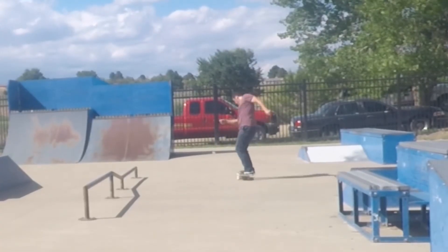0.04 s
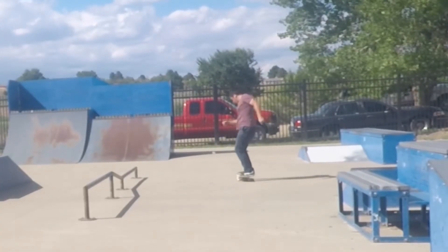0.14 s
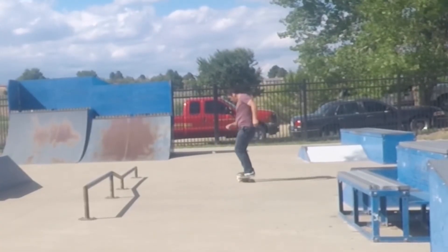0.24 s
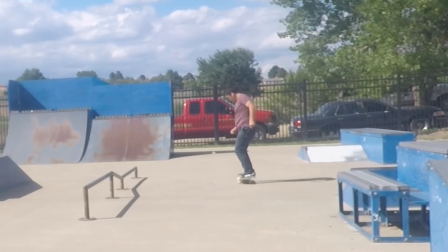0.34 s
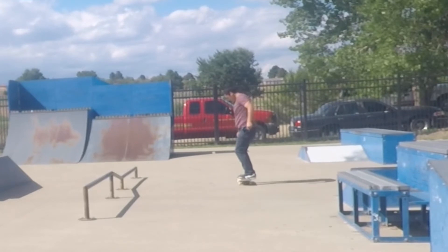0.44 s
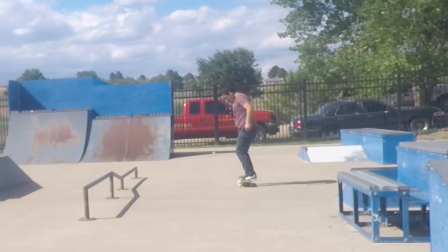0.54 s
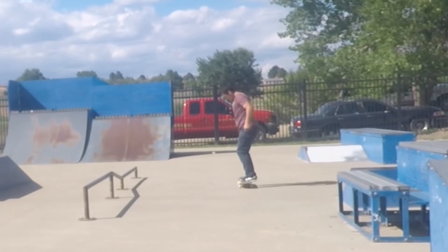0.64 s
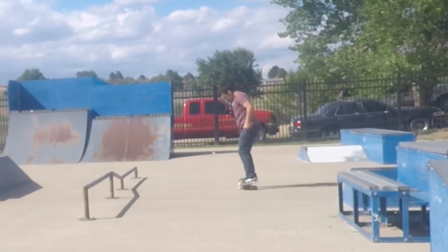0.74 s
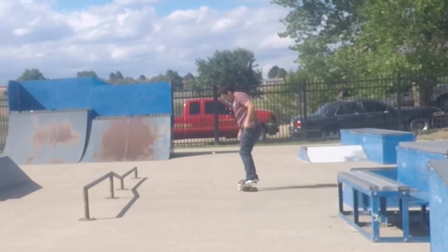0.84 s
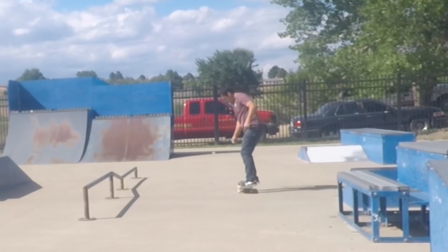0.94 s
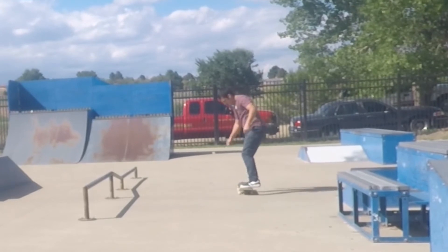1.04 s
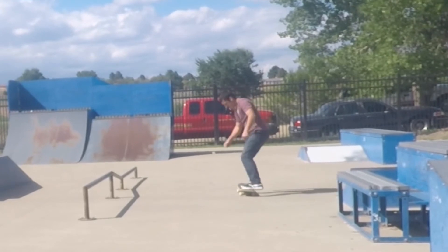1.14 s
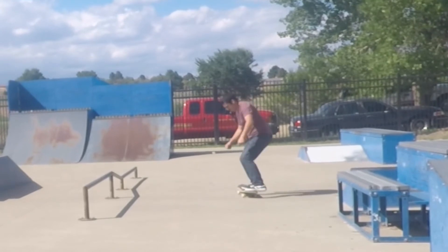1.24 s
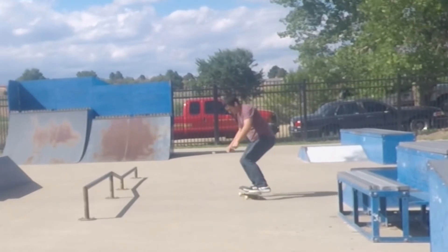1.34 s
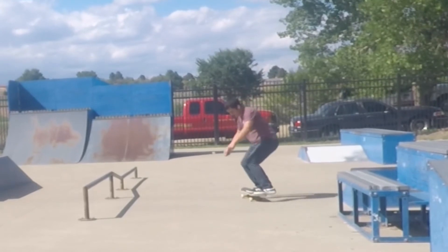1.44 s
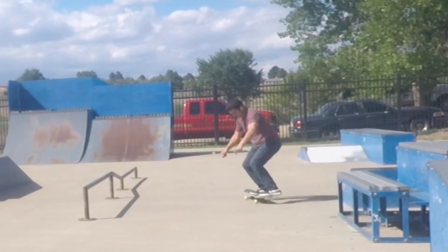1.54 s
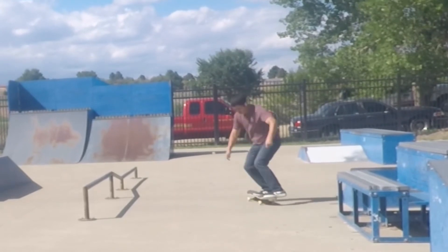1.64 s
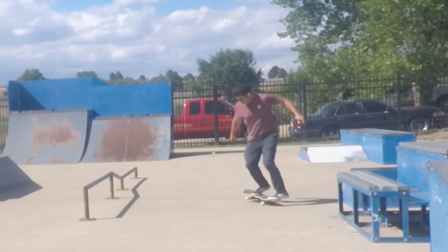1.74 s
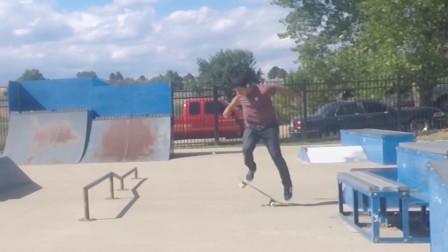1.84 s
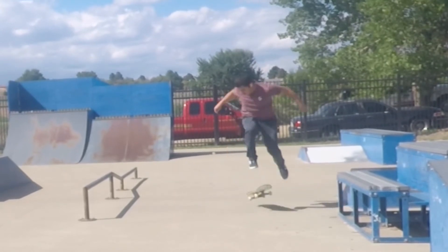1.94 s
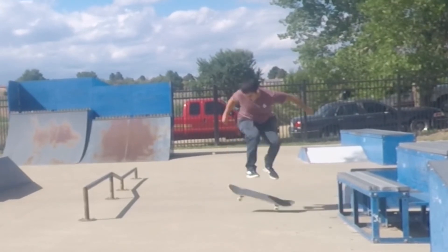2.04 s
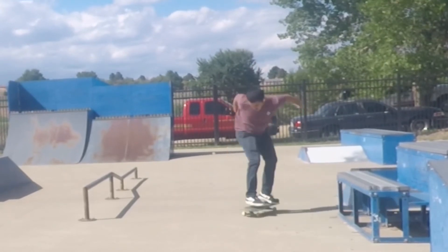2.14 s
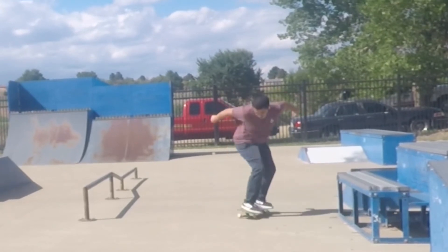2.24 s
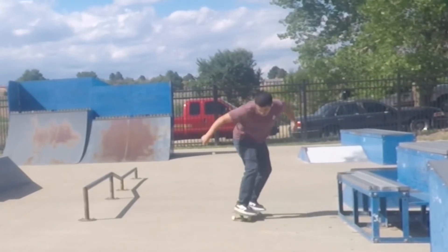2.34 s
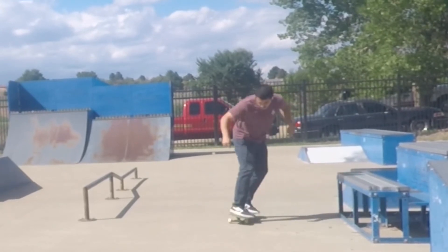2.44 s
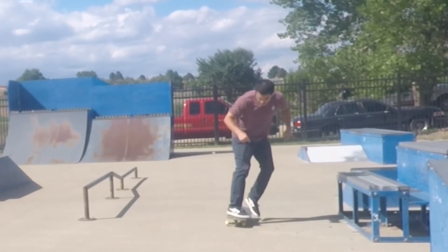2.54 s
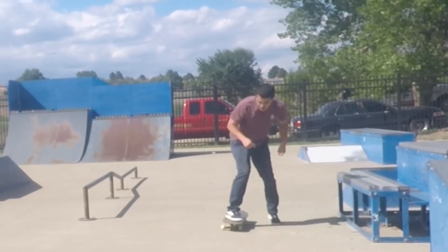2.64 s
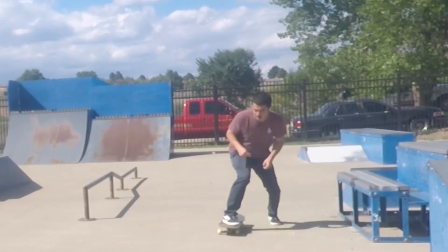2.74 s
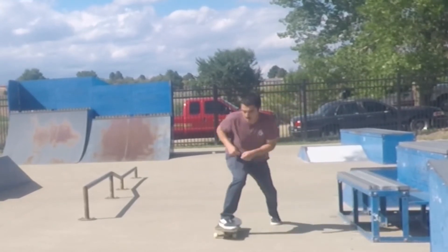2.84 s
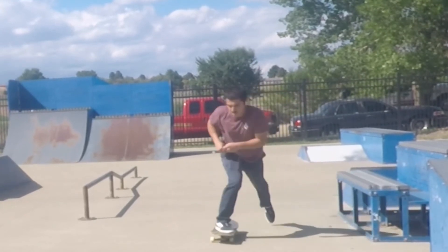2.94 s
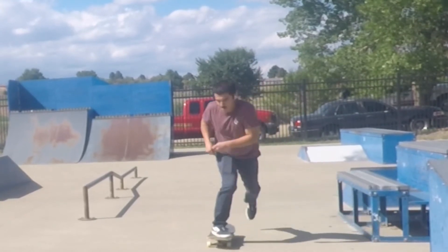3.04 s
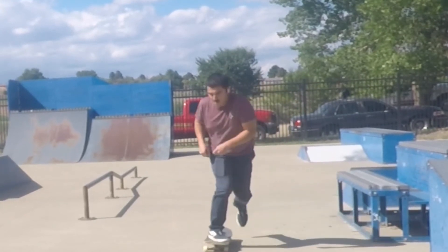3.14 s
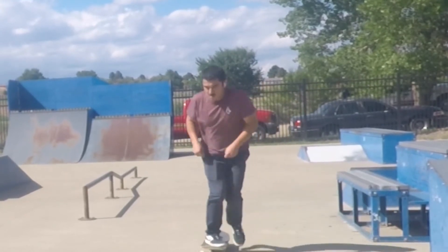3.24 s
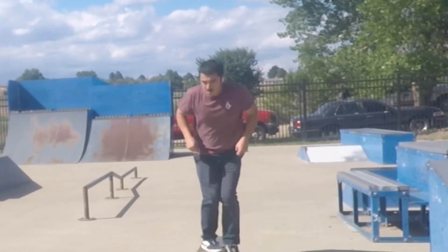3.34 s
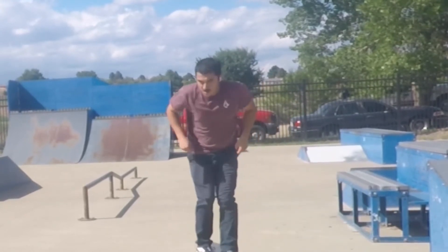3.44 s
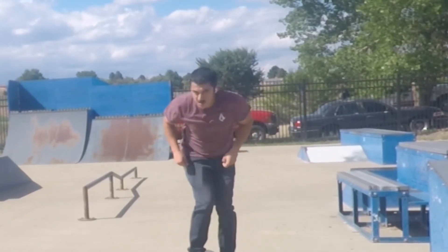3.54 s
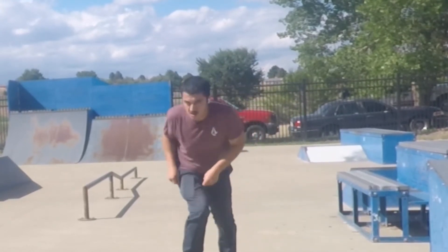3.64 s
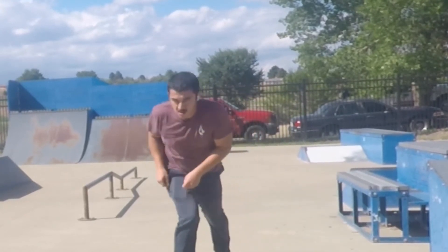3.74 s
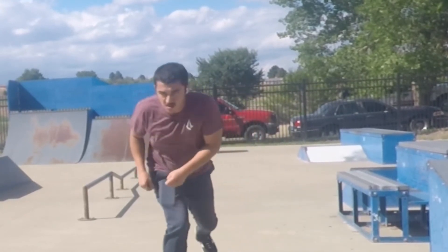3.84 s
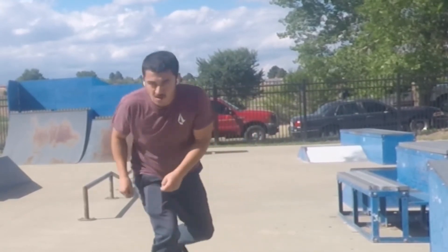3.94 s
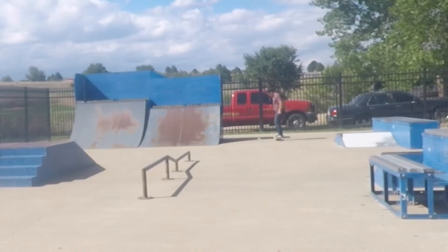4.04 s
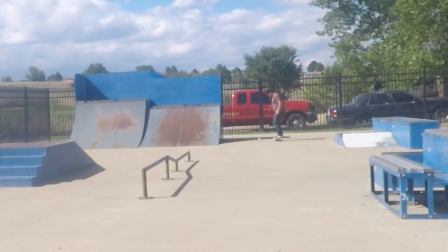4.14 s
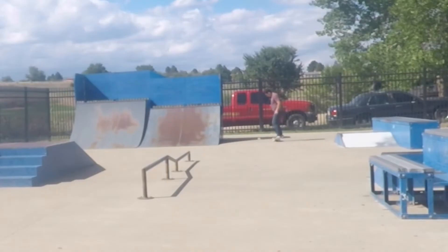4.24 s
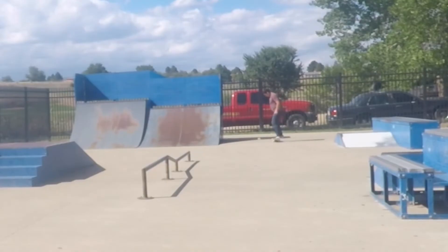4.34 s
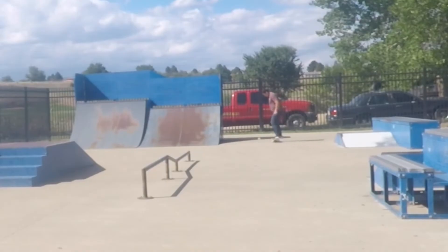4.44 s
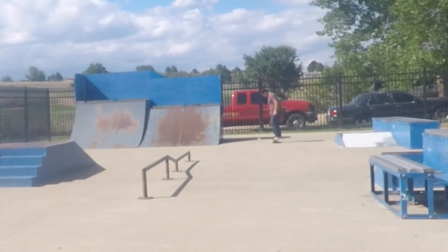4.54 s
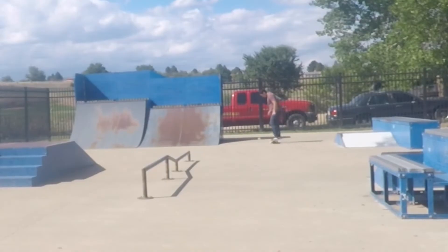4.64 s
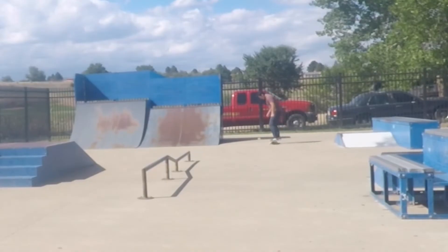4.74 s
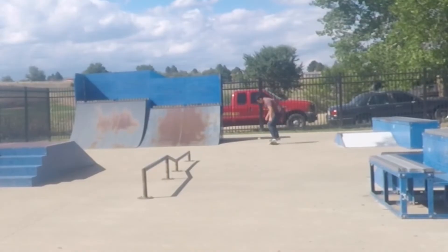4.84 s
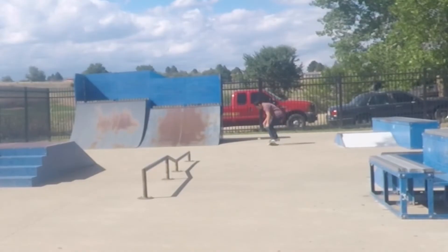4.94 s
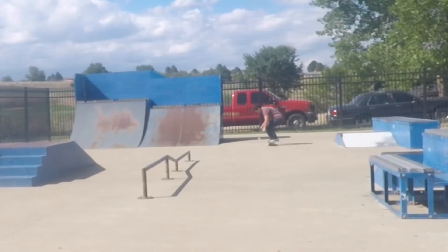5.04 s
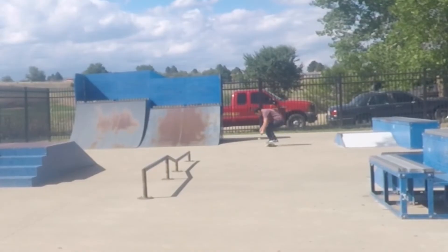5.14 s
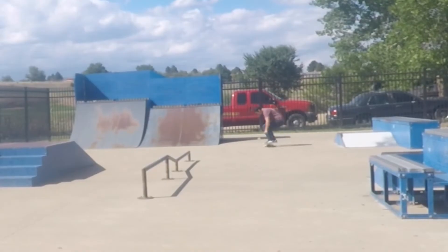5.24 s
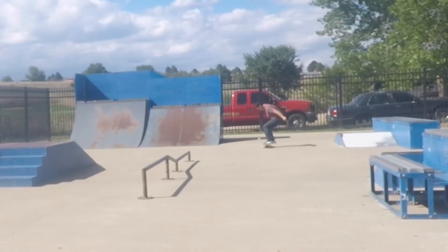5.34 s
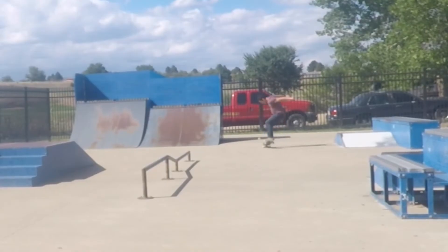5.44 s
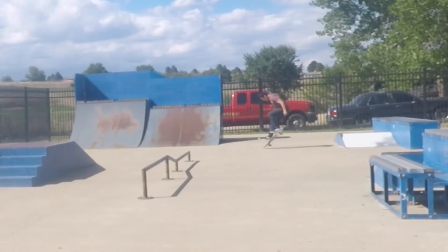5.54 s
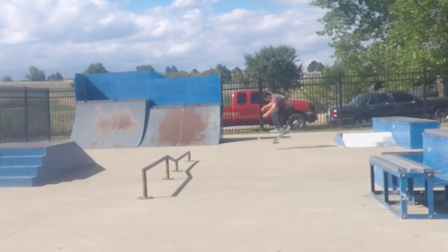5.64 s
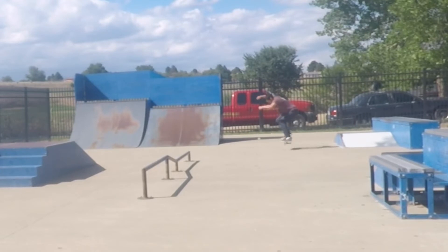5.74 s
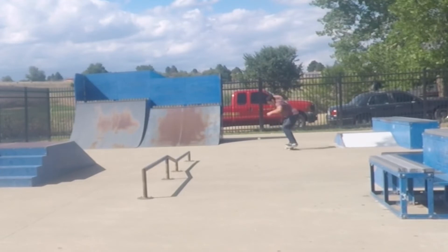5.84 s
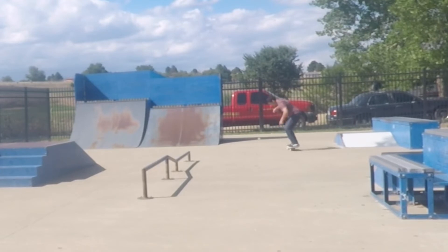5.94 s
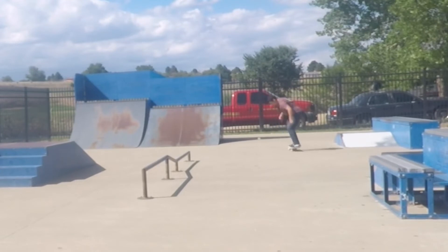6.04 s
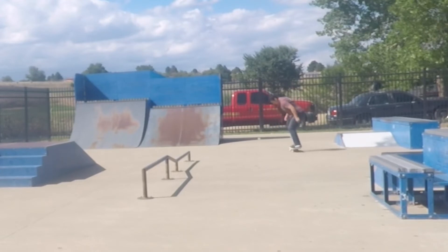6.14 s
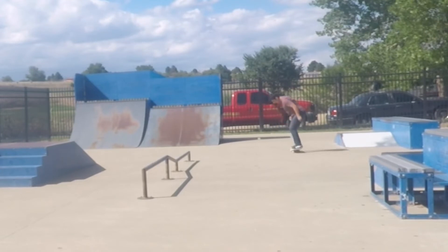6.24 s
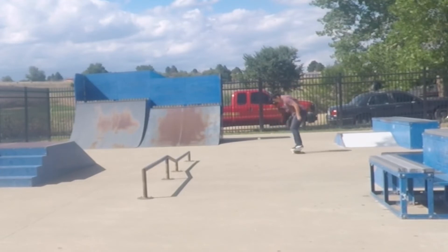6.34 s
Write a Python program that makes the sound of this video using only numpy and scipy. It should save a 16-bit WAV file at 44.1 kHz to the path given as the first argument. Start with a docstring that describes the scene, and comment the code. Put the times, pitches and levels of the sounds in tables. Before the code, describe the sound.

Low wind gusts thump against an outdoor microphone while a skateboard's wheels hum and grind softly on concrete. Near two seconds the tail snaps, then the board slams down in a woody double clack. It rattles and rolls very close, with small squeaks and a ringing shake. An abrupt cut drops to quieter distant rolling, a scrape, and another hard pop and landing with a short echo.

```python
"""Wind buffets two microphone ports, then a skateboard nears over outdoor concrete, pops, flips and lands.
After a cut it does so again far off. Wind and wheels are shaped noise; grit shakes the deck's resonances.
The deck also hums in two wavering tones, metal squeaks in gliding sines, and the camera stand rings.
Blows and scrapes are shaped bursts through resonances, answered by a short scatter from ramps and fence."""
import sys
import numpy as np
from scipy import signal
from scipy.fft import rfft, irfft, next_fast_len
from scipy.io import wavfile
from scipy.ndimage import map_coordinates

SR = 44100
rng = np.random.default_rng(int(sys.argv[2]) if len(sys.argv) > 2 else 0)


def level_to_linear(level):
    """Convert decibel levels to linear amplitude factors, elementwise."""
    exponent = np.asarray(level, float) / 20
    return 10 ** exponent


def store_wav(level_fs):
    """Save 16-bit WAV to argv[1]."""
    pcm = np.round(np.clip(np.atleast_2d(level_fs), -1, 1) * 32767)
    wavfile.write(sys.argv[1], SR, pcm.T.astype(np.int16))


N = 282240
T = np.arange(N) / SR  # seconds

# Fade out and in where the near scene is cut to the far one. Each row: time in seconds, gain as a factor.
CUT = [(3.985, 0.94), (4.018, 0.26), (4.026, 0.066), (4.045, 1)]
CUT_S = CUT[1][0]
# Resonances of the wooden deck. Each row: centre in Hz, width in Hz, peak gain in dB.
DECK = [(710.5, 78, 1), (973, 30, 1.5), (1178, 14, -5.5), (1424, 85, -4), (1606, 27, -12.5), (1924, 41, -9)]


def along(points, hz):
    """Spectra are interpolated on a logarithmic frequency axis."""
    f, v = np.transpose(points)
    return np.interp(np.log(hz + 1), np.log(f + 1), v)


def curve(rows):
    """An envelope in dB runs straight between its (s, dB) rows."""
    return np.interp(T, *np.transpose(rows))


def wobble(rate):
    """Slow random modulation: a smooth curve through rate random knots a second."""
    return map_coordinates(rng.standard_normal(int(N * rate / SR) + 4), [T * rate])


def bump(middle, length):
    """A raised-cosine window swells and fades smoothly over length seconds."""
    return np.cos(np.pi * np.clip((T - middle) / length, -.5, .5)) ** 2


def filtered(x, response):
    """Linear filtering: the spectrum of x times a complex response of frequency."""
    m = next_fast_len(N + SR // 2)
    return irfft(rfft(x, m) * response(np.fft.rfftfreq(m, 1 / SR)), m)[..., :N]


def modes(table):
    """Modal superposition: damped resonators of (Hz, width Hz, dB), added with alternating sign."""
    def response(f):
        total = 0
        for k, (centre, width, db) in enumerate(table):
            damping = 1j * f * width
            total = total + (-1) ** k * level_to_linear(db) * damping / (centre ** 2 - f ** 2 + damping)
        return total
    return response


def colour(spectrum):
    """Spectral shaping by a (Hz, dB) gain, with nothing audible below 10 Hz."""
    return lambda f: level_to_linear(np.where(f < 10, -120, along(spectrum, f)))


def grit(response, lumpy_db, rate):
    """Granular excitation: two unrelated filtered noises of rms 1 whose size jumps about as grains pass."""
    grains = level_to_linear(lumpy_db * wobble(rate)) * rng.standard_normal((2, N))
    x = filtered(grains, response)
    return x / x.std(axis=1, keepdims=True)


def knocked(size, top_hz):
    """Band-limited excitation: chatter of the given size in the wooden middle band."""
    band = signal.butter(N=3, Wn=[400, top_hz], btype="band", fs=SR, output="sos")
    return level_to_linear(7.5) * signal.sosfilt(band, size * rng.standard_normal(len(size)))


def wind():
    """Turbulent pressure on the ports: a deep buffet and a faster flutter, over steady far hiss."""
    # Strength of the gusts. Each row: time in seconds, level in dB.
    gust_level = [(0.0, -8.5), (0.32, -15.5), (0.91, -11.5), (1.6, -12), (1.95, -20), (2.03, -11.5),
                  (2.47, -16), (2.64, -34.5), (3.3, -26.5), (3.77, -26.5), (3.97, -13.5), (4.03, -44.5),
                  (4.8, -41), (5.1, -25), (5.2, -31), (5.28, -16), (5.5, -31), (6.4, -29)]
    # Strength of the faster flutter near 100 Hz. Each row: time in seconds, level in dB.
    flutter_level = [(0, -50), (0.35, -37.5), (0.9, -25.5), (1.56, -23.5), (1.85, -34), (2.5, -26),
                     (3.97, -21.5), (4.03, -31.5), (4.55, -35.5), (5.3, -27.5), (5.8, -27.5), (5.9, -31),
                     (6.34, -22.5)]
    # Spectrum of the deep buffet. Each row: frequency in Hz, relative density in dB per Hz.
    buffet_spectrum = [(18, -10), (35, 5), (60, -4), (100, -9.5), (300, -30), (600, -95.5)]
    # Spectrum of the flutter. Each row: frequency in Hz, relative density in dB per Hz.
    flutter_spectrum = [(60, -34), (85, 6.5), (105, 6.5), (140, 4.5), (250, -7.5), (500, -65)]
    # Far leaves and microphone hiss. Each row: frequency in Hz, relative density in dB per Hz.
    air_spectrum = [(2000, -8), (4000, -7), (5700, -6.5), (7500, -9), (10000, -12.5), (12500, -23),
                    (15000, -27)]
    buffet = level_to_linear(curve(gust_level)) * grit(colour(buffet_spectrum), 1.8, 12)
    flutter = level_to_linear(curve(flutter_level)) * grit(colour(flutter_spectrum), 1.7, 16)
    air = level_to_linear(-57) * grit(colour(air_spectrum), .5, 32)
    return buffet + flutter + air


def puffs():
    """Local turbulence: sudden brighter bursts of wind, each stronger on one port."""
    # Each row: middle in seconds, length in seconds, level in dB, left over right in dB, top in Hz.
    bursts = [(0.025, 0.013, -21, -2, 500), (0.135, 0.035, -12, -7.5, 460), (0.181, 0.026, -22.5, -15, 380),
              (1.228, 0.022, -26, -7, 480), (1.392, 0.047, -20.5, -8, 380), (1.23, 0.47, -29, -7, 330),
              (1.507, 0.051, -23.5, -3.5, 350), (1.581, 0.082, -22, 9, 770), (1.716, 0.033, -27, -7, 350)]
    out = np.zeros((2, N))
    for s, length, db, pan_db, top_hz in bursts:
        ports = level_to_linear([[db + pan_db / 2], [db - pan_db / 2]])
        band = lambda f: f / (80 + f) / (60 + f) / (1 + (f / top_hz) ** 4)
        out += bump(s, length) * ports * grit(band, 2.1, 150)
    return out


def stand():
    """Structure-borne sound: the board shakes the ground and the camera stand rings in its own modes."""
    # Ground shake from pop, landing and the board rolling close. Each row: time in seconds, level in dB.
    shake_level = [(1.95, -70), (1.98, -32), (2.1, -20), (2.6, -25), (2.9, -27), (3.28, -32), (3.4, -21.5),
                   (4.0, -17), (4.03, -68), (5.74, -70), (5.8, -28), (6.4, -38)]
    # Modes of the stand, passed twice. Each row: centre in Hz, width in Hz and peak gain in dB of one pass.
    stand_modes = [(99.5, 11, 4), (384, 10.6, 1.5), (417, 15, -7.5), (513.4, 20, -2), (560.5, 12.7, -1)]
    ringing = grit(lambda f: modes(stand_modes)(f) ** 2, 4.0, 27)[0]
    ports = level_to_linear([[0], [-11.5]]) * [[1], [-1]]  # mostly left, opposite in sign
    return level_to_linear(curve(shake_level)) * ringing * ports


def hum():
    """Sustained bending vibration: the wheels keep the near deck's two lowest modes ringing unsteadily."""
    # First bending mode. Each row: time in seconds, level in dB.
    first_level = [(0.0, -53.5), (0.13, -22), (0.22, -33), (0.37, -20), (0.6, -31), (0.91, -19),
                   (1.24, -26), (1.58, -72), (1.73, -21), (1.92, -50), (2.05, -26.5), (2.66, -19.5),
                   (3.29, -31), (3.39, -13.5), (3.54, -24), (3.64, -9.5), (3.84, -13), (4.0, -19.5)]
    # Second bending mode. Each row: time in seconds, level in dB.
    second_level = [(0, -47), (0.28, -49), (0.4, -37.5), (0.6, -40), (0.9, -35.5), (1.05, -46),
                    (1.78, -48.5), (1.87, -33), (1.97, -34), (2.05, -46.5), (4.0, -46)]
    first_hz = 186.1 - 3.6 * T  # sinks as the board comes near
    second_hz = 1.99 * first_hz
    tone = np.zeros(N)
    for level, hz in ((first_level, first_hz), (second_level, second_hz)):
        size = level_to_linear(curve(level) + 1.77 * wobble(21.965))
        wavering_hz = hz * (1 + 0.0085 * wobble(21))
        tone += size * np.sin(2 * np.pi * np.cumsum(wavering_hz) / SR)
    ports = np.array([tone, np.roll(tone, 200)])  # the second is 200 samples late
    return np.sqrt(2) * (T < CUT_S) * ports  # a sine of rms 1 peaks at root two


def squeaks():
    """Friction whistles: brief broken tones of metal in the wheels and trucks."""
    # Each row: start in seconds, length in seconds, nominal pitch in Hz, level in dB before the swell.
    whistles = [(0.737, 0.025, 8100, -59), (2.591, 0.022, 3245, -38.5), (2.614, 0.2, 3230, -59),
                (3.055, .04, 8560, -54), (3.49, .03, 8600, -63), (3.583, 0.063, 8330, -49),
                (3.83, 0.096, 8600, -50)]
    out = np.zeros(N)
    for s, length, hz, db in whistles:
        u = np.clip((T - s) / length, 0, 1)
        arch = np.sin(np.pi * u)
        pitch = hz * (1 + 0.017 * arch + 0.022 * wobble(300))
        swell = (1.57 + wobble(142.8)) * np.sqrt(arch.clip(0))
        out += level_to_linear(db) * swell * np.sin(2 * np.pi * np.cumsum(pitch) / SR)
    return out


def rolling():
    """Roughness excitation: wheels on concrete rumble, roar through the deck's modes and hiss together."""
    # Loudness from distance and load. Each row: time in seconds, level in dB.
    roll_level = [(0.0, -48.5), (1.45, -45.5), (1.92, -50), (2.04, -41), (2.13, -24.5), (2.17, -36),
                  (2.3, -37.5), (2.42, -42.5), (2.7, -41), (3.3, -36), (3.41, -29), (3.8, -30), (4.0, -27),
                  (4.03, -46.5), (4.98, -46), (5.34, -43.5), (5.74, -48), (5.89, -35), (6.03, -45),
                  (6.4, -44.5)]
    # Low rumble. Each row: frequency in Hz, relative density in dB per Hz.
    rumble_spectrum = [(120, -46), (200, -3), (300, -10), (450, -9), (650, -15), (1200, -66)]
    # Roar beside the deck's modes. Each row: frequency in Hz, density in dB per Hz, 6 dB above its use.
    roar_spectrum = [(300, -53.5), (550, -13), (1000, 2), (2000, -13.5), (2800, -61), (4000, -53)]
    # Hiss of the grit. Each row: frequency in Hz, relative density in dB per Hz.
    hiss_spectrum = [(1500, -20), (2500, -11), (3000, -20), (4000, -15.5), (5700, -5), (6600, -12.5),
                     (7500, -21.5), (9500, -26), (11000, -48.5)]
    surge_db, surges_per_s = 1.5, 14  # patches of rougher and smoother concrete
    roll_db = curve(roll_level) + surge_db * wobble(surges_per_s)
    over_quiet_db = roll_db + 46  # above a quiet roll of -46 dB
    far = T > CUT_S  # rumble and hiss are both stronger in the far scene
    rumble_db = -39.5 + 1.01 * over_quiet_db + 2 * far
    hiss_db = -53 + 0.9 * over_quiet_db + 1.5 * far
    through_deck = lambda f: level_to_linear(-6) * colour(roar_spectrum)(f) + modes(DECK)(f)
    rumble = level_to_linear(rumble_db) * grit(colour(rumble_spectrum), 1.4, 60)
    roar = level_to_linear(roll_db) * grit(through_deck, 0.89, 250)
    hiss = level_to_linear(hiss_db) * grit(colour(hiss_spectrum), 0.67, 200)
    return rumble + roar + hiss


def contacts():
    """Impact and friction: blows chatter, thud, knock the deck and crack; swelling bursts are mostly scrapes."""
    # Blows of board and ground, as drive before the filters.
    # Each row: start in seconds, knock in dB, thud over knock in dB, crack over knock in dB.
    hits = [(0.991, -33.5, 1, -18), (1.964, -15.5, 11.5, -6.5), (1.997, -38, 7, -4),
            (2.058, -25.5, 5.5, -10), (2.07, -16, -4.5, -36.5), (2.097, -9.5, 1, -6),
            (2.104, -19.5, 6, -18.5), (2.119, -20, 6.5, -7), (2.461, -30, 9, -17), (2.514, -34.5, 10.5, -8),
            (2.536, -22.5, -1, -19.5), (2.64, -28, 1.5, -27), (3.462, -32, -8, -3), (3.588, -26, 2, -19),
            (3.978, -20, -5, -15.5), (5.09, -21.5, -3.5, -35.5), (5.718, -21.5, -22, -18.5),
            (5.727, -28.5, 6.5, -8), (5.77, -6.5, -4, -20.5), (5.784, -11, 5, -14.5), (5.807, -41, -8, 5),
            (5.85, -20.5, 1.5, -31)]
    # Shoe, tail and wheels dragging, and one short bright blow at 5.762 s, as drive before the filters.
    # Each row: middle in seconds, length in seconds, knock in dB, crack in dB, top of the knock in Hz.
    swells = [(0.733, 0.074, -37.5, -71, 1900), (2.017, .1, -37.5, -49, 2040),
              (2.084, 0.039, -25, -51, 2200), (2.156, 0.026, -45, -41.5, 1500),
              (2.231, 0.094, -27.5, -58, 2010), (2.59, 0.07, -35.5, -39, 2560),
              (3.428, 0.059, -30.5, -52.5, 2030), (3.51, 0.078, -24.5, -55, 1930),
              (5.456, 0.22, -35.5, -61, 1860), (5.762, 0.015, -16, -27, 1520),
              (5.855, 0.026, -20, -46, 1890), (5.885, 0.32, -33.5, -51, 1980)]
    # Modes of the loaded deck. Each row: centre in Hz, width in Hz, peak gain in dB.
    thud_modes = [(244.3, 39.6, 18.5), (501, 107, 12)]
    # Bright edge of a blow, passed twice. Each row: centre in Hz, width in Hz and gain in dB of one pass.
    crack_modes = [(3590, 1020, 3.5), (5930, 1320, 8), (8600, 2750, -2.5)]
    # Steel that rings on faintly after a blow. Each row: centre in Hz, width in Hz, peak gain in dB.
    axle_modes = [(958, 2.2, 20), (1278, 5, 6), (1575, 4.5, 13)]
    t = np.arange(SR // 8) / SR
    thud, knock, crack = np.zeros((3, N + SR))
    push = np.sin(np.pi * np.clip(t / 0.0015, 0, 1))  # the weight arrives in one soft blow
    chatter_shape = (1 - np.exp(-t / 0.00017)) * np.exp(-(t / 0.0096) ** 2)
    for s, db, thud_db, crack_db in hits:
        start = round(s * SR)
        at = slice(start, start + len(t))
        chatter = level_to_linear(db) * chatter_shape
        thud[at] += level_to_linear(db + thud_db) * push
        knock[at] += knocked(chatter, top_hz=2300 * 2 ** (crack_db / 35))  # harder contact, brighter knock
        crack[at] += level_to_linear(crack_db) * chatter
    thud, knock, crack = thud[:N], knock[:N], crack[:N]
    ring = level_to_linear(3 * wobble(25)) * filtered(knock, modes(axle_modes))  # unsteady as the wheels turn
    for s, length, knock_db, crack_db, top_hz in swells:
        swell = bump(s, length)
        knock = knock + knocked(level_to_linear(knock_db) * swell, top_hz)
        crack = crack + level_to_linear(crack_db) * swell
    body = filtered(thud, modes(thud_modes))
    wood = filtered(knock, lambda f: 1 + level_to_linear(10.5) * modes(DECK)(f))
    edge = filtered(crack * rng.standard_normal(N), lambda f: modes(crack_modes)(f) ** 2)
    return body + wood + ring + edge


def ramps(x):
    """Diffuse reflection: ramps and fence throw back a short, different scatter to each port."""
    t = np.arange(SR // 3) / SR
    decay = level_to_linear(-60 * t / 0.14)  # 60 dB in 0.14 s
    tail = rng.standard_normal((2, len(t))) * decay * (t > .012)
    return signal.fftconvolve(x[None], tail / np.linalg.norm(tail[0]), axes=1)[:, :N]


def scene():
    """Partial coherence: airborne sound reaches the left port coloured and shifted; puffs and shake act directly."""
    # Likeness of the ports for wind, hum and rolling. Each row: frequency in Hz, shared amplitude from 0 to 1.
    likeness = [(50, 1), (260, 0.77), (400, 0.5), (750, 0.86), (1400, 0.71), (2300, 0.08), (4000, 0.9),
                (6000, 0.13), (9000, 0)]
    # Colour of the left port against the right. Each row: frequency in Hz, gain in dB.
    left_gain = [(60, -1), (180, -5), (300, -8), (520, -3), (720, -7), (1000, -5), (1550, -1), (1700, 1),
                 (1830, 8), (1980, -1), (2450, -6), (3300, -1), (5300, -16), (7000, -3), (12000, -1)]
    # Phase lead of the left port. Each row: frequency in Hz, lead in radians.
    left_lead = [(320, -.2), (450, 2), (600, 2.8), (950, 2.7), (1150, 1.8), (1550, 2.8), (1700, 3.3),
                 (1900, 4.9), (2250, 1.5), (2500, 0), (3100, .7), (4600, .2), (6800, 3.1), (12000, 6.5)]
    shared, own = wind() + hum() + rolling()
    alike = lambda f: np.clip(along(likeness, f), 0, 1)
    left = filtered(shared, alike) + filtered(own, lambda f: np.sqrt(1 - alike(f) ** 2))
    direct = contacts() + squeaks()
    left, right = np.array([left, shared]) + direct + level_to_linear(-15.5) * ramps(direct)
    left = filtered(left, lambda f: level_to_linear(along(left_gain, f)) * np.exp(1j * along(left_lead, f)))
    return np.array([left, right]) + puffs() + stand()


def roll_off(x):
    """The treble ends steeply here."""
    return signal.sosfilt(signal.butter(12, 14000, fs=SR, output="sos"), x)


def record(dry):
    """Soft saturation: the cut joins the two scenes, and peaks are gently squeezed below 0.98."""
    x = dry * np.interp(T, *np.transpose(CUT))
    mix = x / (1 + np.abs(x / .98) ** 6) ** (1 / 6)
    return roll_off(mix)


dry = scene()
out = record(dry)
store_wav(out)
```